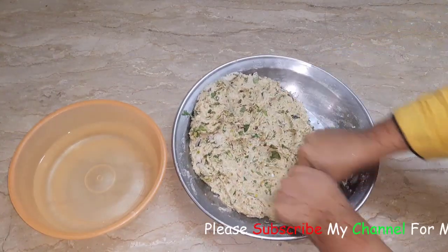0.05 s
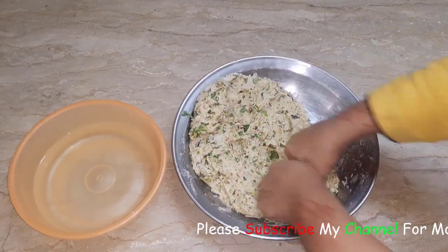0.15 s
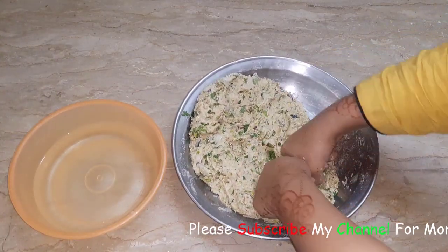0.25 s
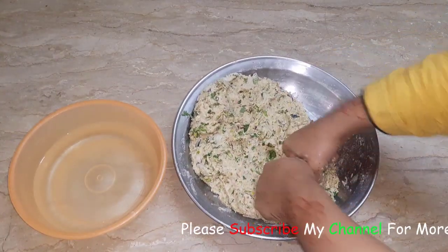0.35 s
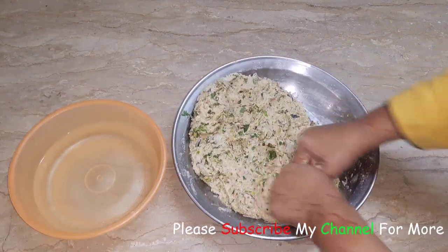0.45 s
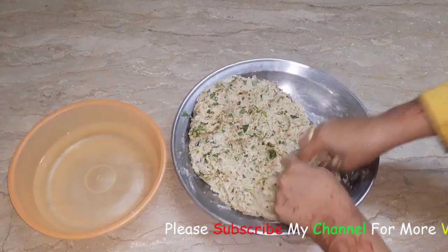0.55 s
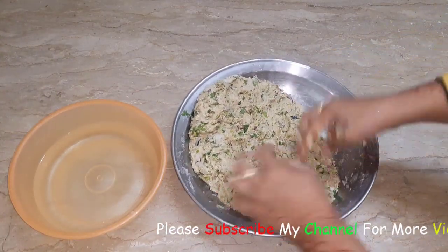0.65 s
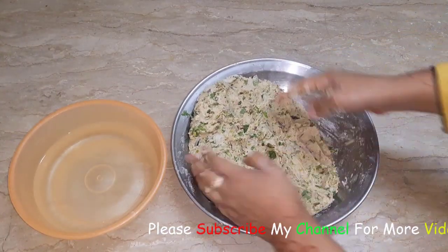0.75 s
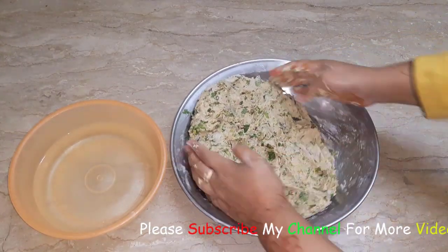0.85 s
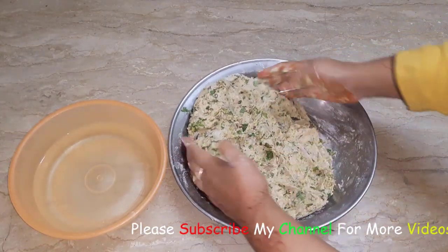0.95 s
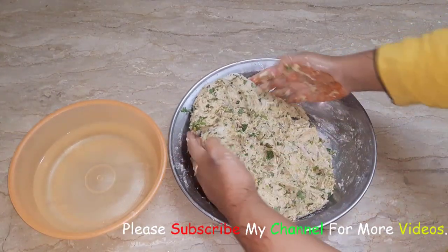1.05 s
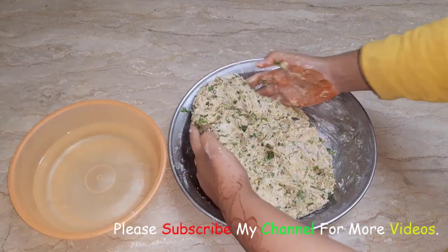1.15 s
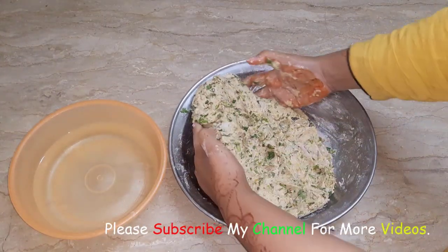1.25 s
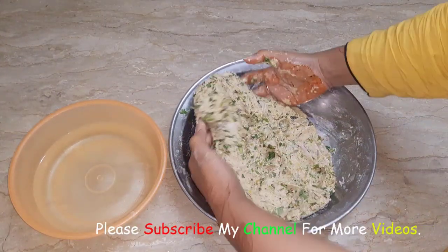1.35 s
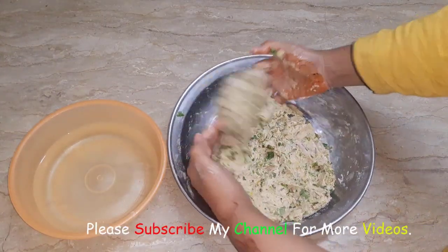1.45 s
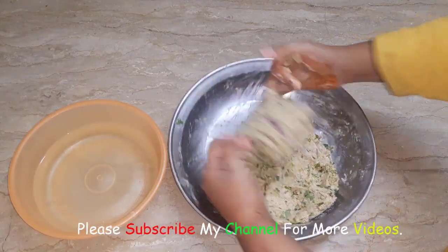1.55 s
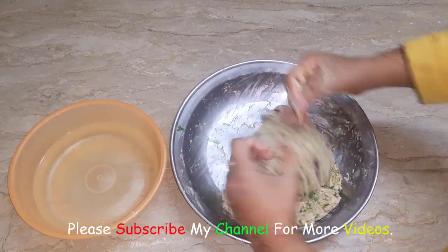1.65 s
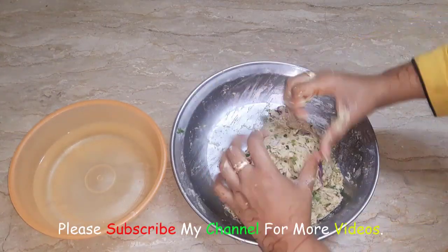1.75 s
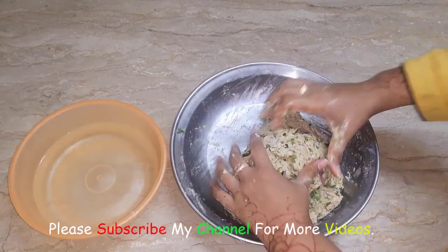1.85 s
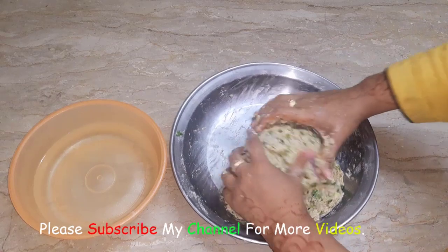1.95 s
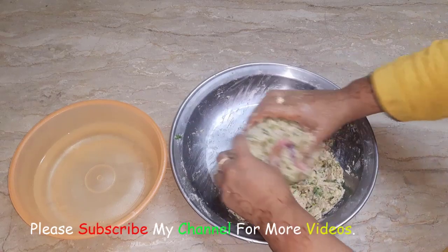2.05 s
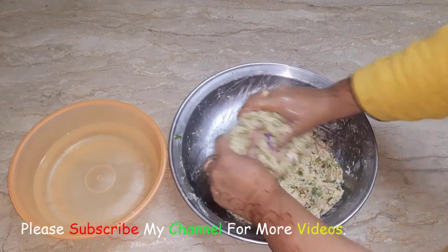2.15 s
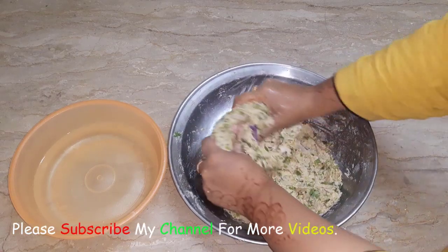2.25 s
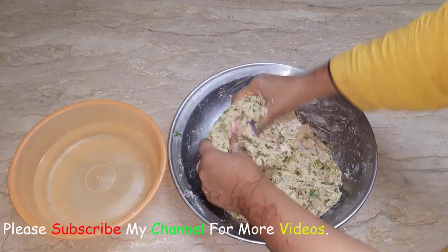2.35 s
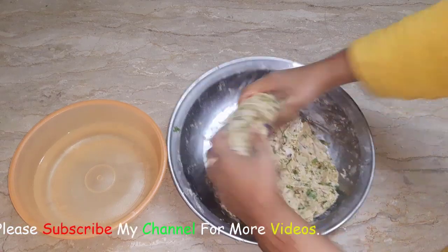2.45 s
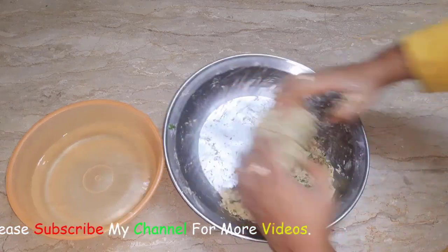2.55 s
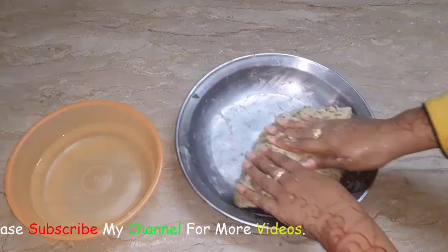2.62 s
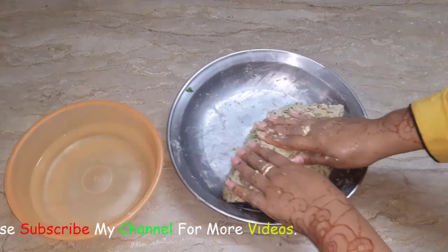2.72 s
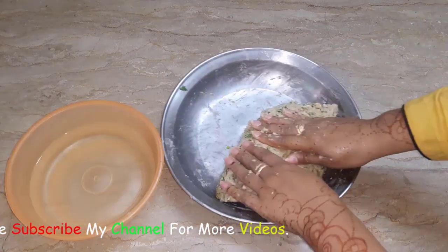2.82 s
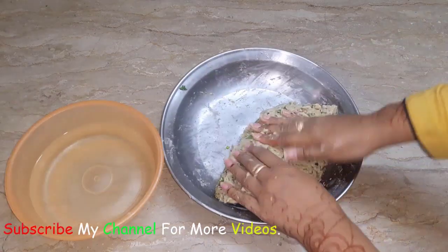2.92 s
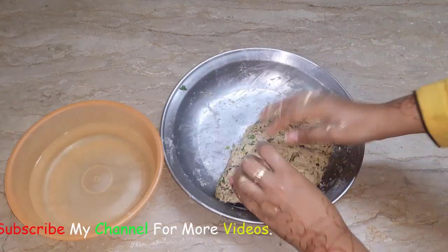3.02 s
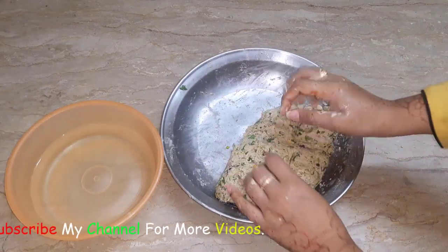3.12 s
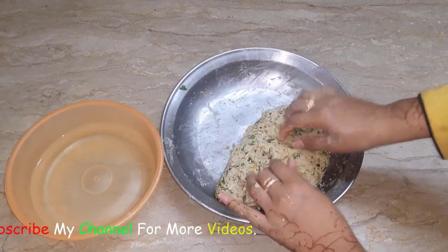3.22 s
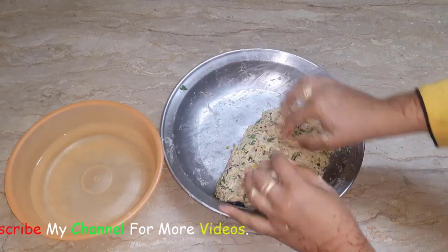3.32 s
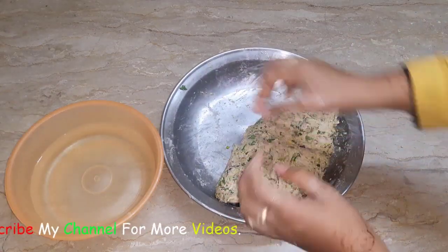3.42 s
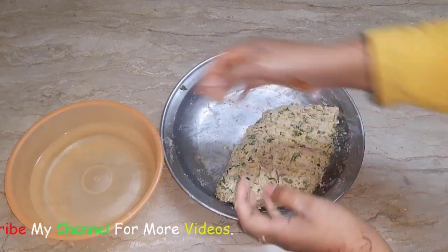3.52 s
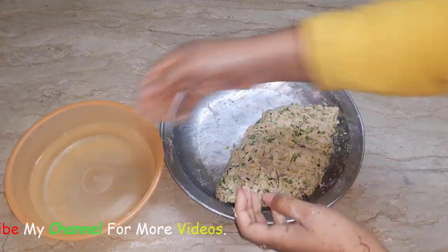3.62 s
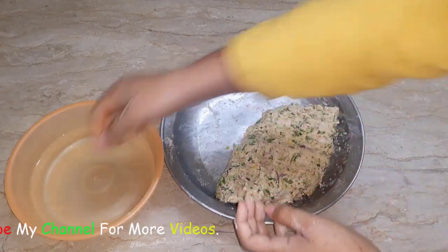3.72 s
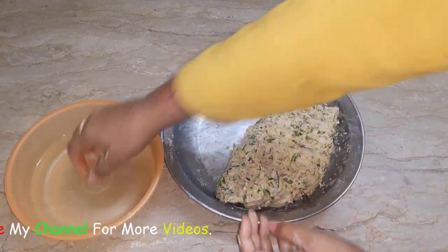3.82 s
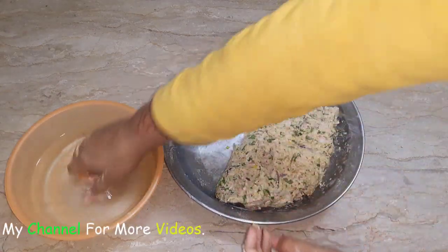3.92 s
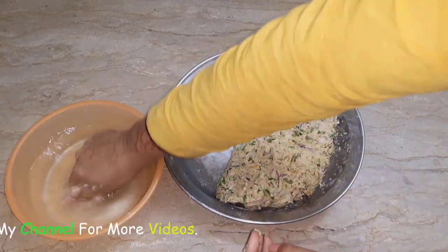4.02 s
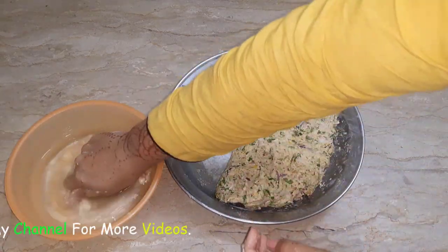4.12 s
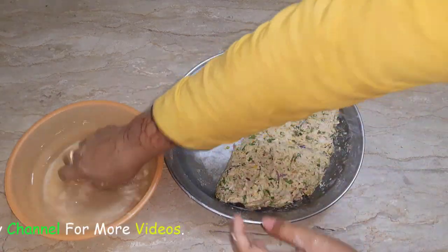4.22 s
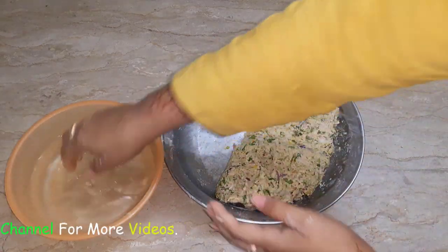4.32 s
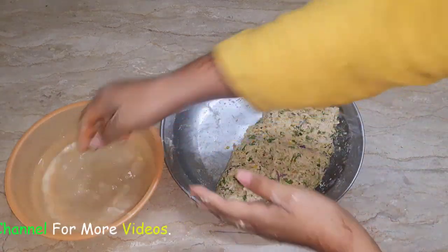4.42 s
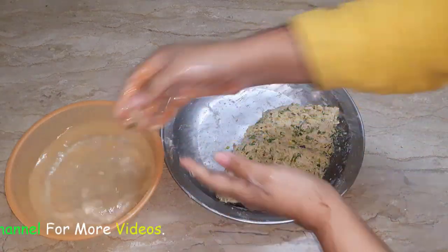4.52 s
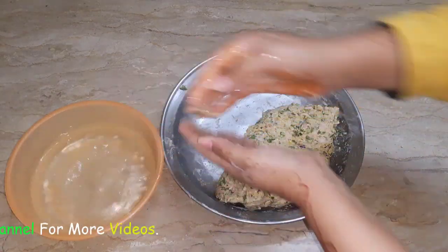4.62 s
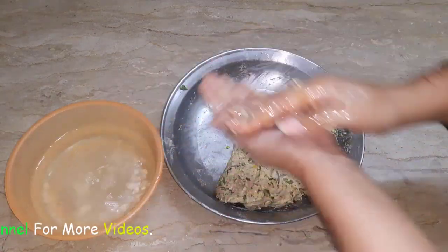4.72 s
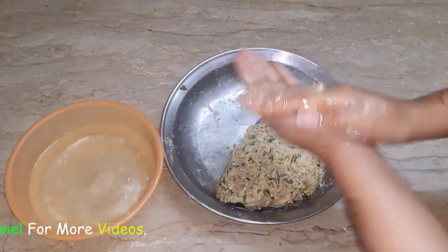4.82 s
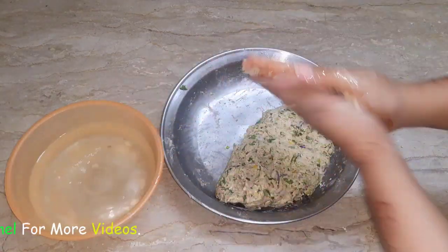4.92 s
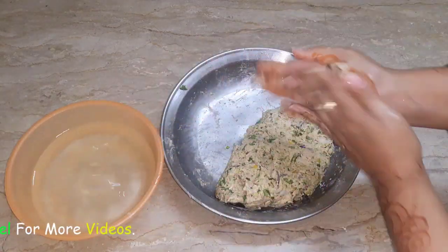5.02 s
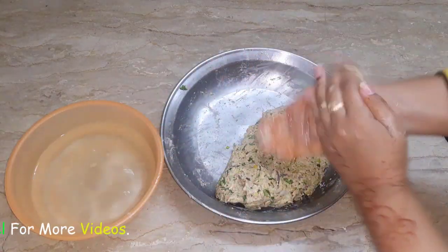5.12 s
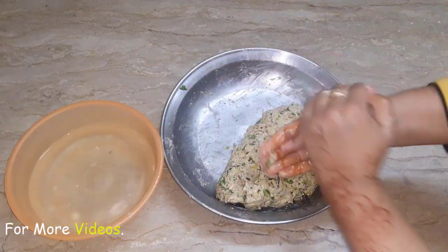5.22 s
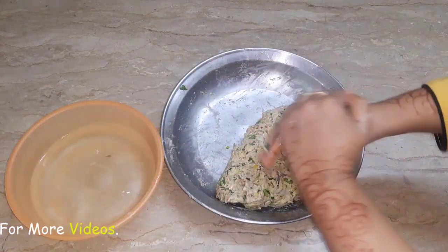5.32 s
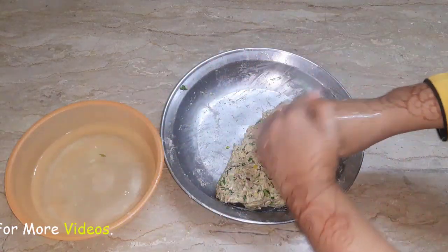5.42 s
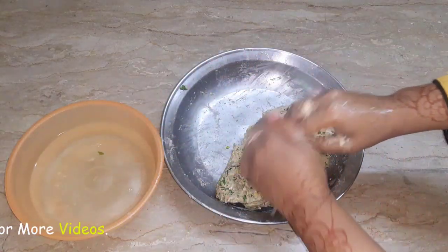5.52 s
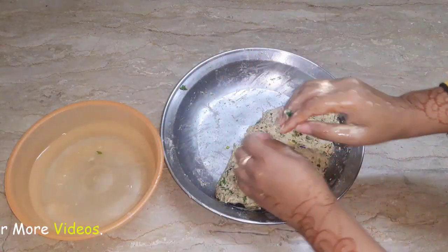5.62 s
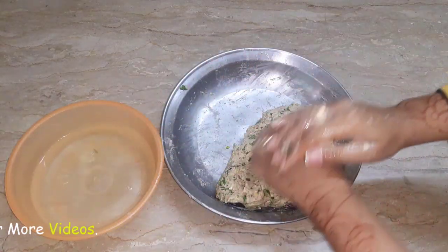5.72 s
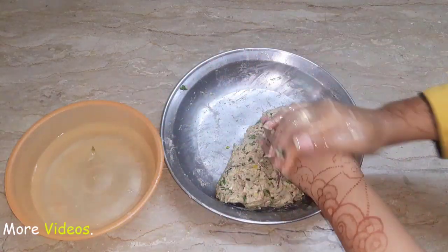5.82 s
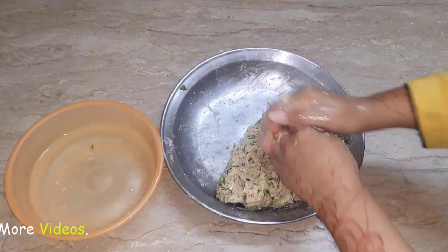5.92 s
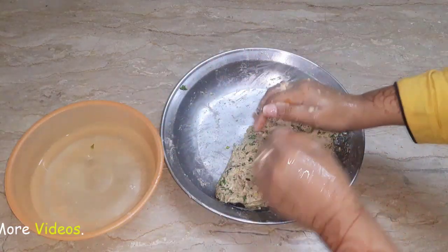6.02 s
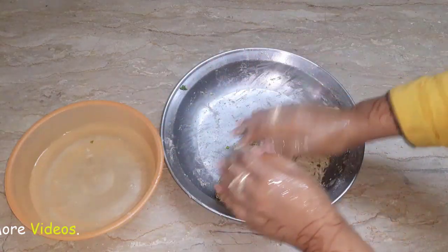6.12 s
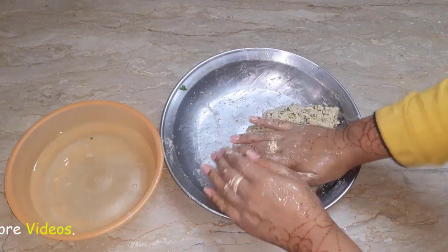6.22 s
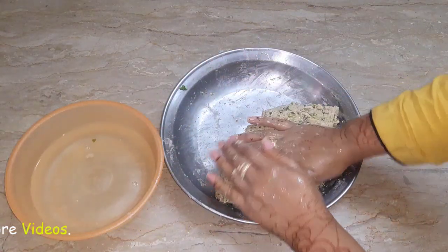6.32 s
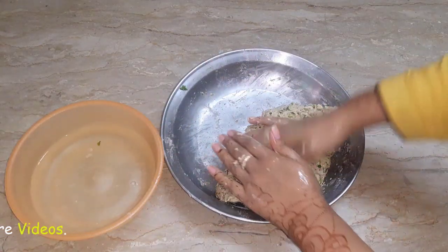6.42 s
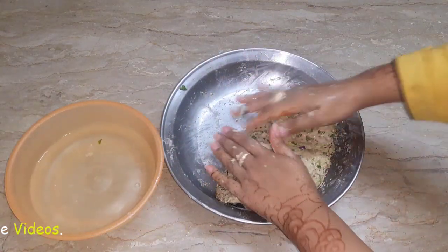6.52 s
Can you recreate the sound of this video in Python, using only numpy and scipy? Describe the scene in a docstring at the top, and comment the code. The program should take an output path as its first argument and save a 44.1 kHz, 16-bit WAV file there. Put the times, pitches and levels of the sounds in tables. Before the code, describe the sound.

A loud clattering thump opens, followed by more plate knocks, grainy dough rustle and tiny clicks, peaking in a rapid burst of heavy blows. The ringing is chopped off by an edit. Then faint skin rubbing, a brief dip in water with bubbly plips, a squishy squeeze of wet hands and a soft press on dough. Close stereo pickup in a hard-surfaced home room, with faint low hum.

```python
"""Hard knocks and a rustle of wet dough, small sharp ticks, a hand in water, over a low wavering hum. Hands
fold wet dough in a steel plate on a stone floor: blows are noise cracks, sine thumps and low resonances; rubs
and presses are shaped grains of noise; ticks and drips are short sines that rise in pitch. Knocks, booms, ticks
and drips ring in a hard room made of sparse random taps. An edit joins two shots and chops the ringing of the
first."""
import sys
import numpy as np
from scipy import signal
from scipy.fft import rfft, irfft, next_fast_len
from scipy.io import wavfile

SR = 44100
rng = np.random.default_rng(int(sys.argv[2]) if len(sys.argv) > 2 else 0)


def ratio(d):
    """dB to gain"""
    e = np.asarray(d, float) / 20
    return 10 ** e


def int16_out(signal):
    """Quantize to a 16-bit WAV file."""
    q = np.round(np.clip(np.atleast_2d(signal).T, -1, 1) * 32767)
    wavfile.write(sys.argv[1], SR, q.astype(np.int16))


N = 289296  # length in samples
EDIT_S = 2.644  # the second shot begins

# low resonances that blows and grinding set ringing: f/Hz, level/dB, t60/s
LOW_MODES = [(156, 2, 0.13), (300.8, 1, 0.18), (337.3, -19, 0.041), (431, -9, 0.17), (507.6, -6.5, 0.22),
             (614, -21, 1), (727.3, -7.5, 0.17), (793, -23, 0.69), (807, -16.5, 0.2)]


def evened(x):
    """Scales to rms 1."""
    return x / np.sqrt(np.mean(x ** 2) + 1e-20)


def read(points, hz):
    """Reads a curve on a log-frequency axis."""
    f, value = np.transpose(points)
    return np.interp(np.log(hz + 1), np.log(f + 1), value)


def add(mix, s, sound):
    """Mixes a sound in at time s."""
    part = mix[..., round(s * SR):][..., :sound.shape[-1]]
    part += sound[..., :part.shape[-1]]


def colour(x, gain):
    """Filters by a gain that is a function of frequency."""
    size = next_fast_len(x.shape[-1])
    spectrum = rfft(x, size) * gain(np.fft.rfftfreq(size, 1 / SR))
    return irfft(spectrum, size)[..., :x.shape[-1]]


def resonate(x, hz, width_hz):
    """One resonance of gain 1: shifts the band at hz down to zero, smooths it, and shifts it back."""
    carrier = np.exp(2j * np.pi * np.cumsum(hz * np.ones(N)) / SR)
    pole = np.exp(-np.pi * width_hz / SR)
    smoothed = signal.lfilter([1 - pole], [1, -pole], x / carrier)
    return 2 * (carrier * smoothed).real


def resonate_twice(x, hz, width_hz):
    """Two equal resonances in a row, for steeper flanks; width_hz is that of each."""
    return resonate(resonate(x, hz, width_hz), hz, width_hz)


def pair(left, other):
    """Two channels whose likeness depends on frequency, by mixing shared and independent sound."""
    # likeness of left and right: f/Hz, share
    likeness = [(60, 0.77), (180, 0.96), (400, 0.68), (800, 0.54), (1650, 0.024), (5000, .05)]

    def same(hz):
        return np.clip(read(likeness, hz), 0, 1)
    right = colour(left, same) + colour(other, lambda hz: np.sqrt(1 - same(hz) ** 2))
    return np.array([left, right])


def grains(per_s, spread_db, smooth):
    """Smooth noise with sparse clicks of uneven size on top, two channels."""
    noise = rng.standard_normal((2, N))
    size = ratio(spread_db * np.minimum(rng.exponential(1, N), 4))
    clicks = evened(size * (rng.random(N) < per_s / SR))
    return evened(pair(*(noise * (smooth + clicks))))


def wet_grains():
    """Dense wet clicks over mostly smooth noise."""
    return grains(per_s=400, spread_db=3.5, smooth=2.5)


def same_shot(s, t):
    """A sound begun at s does not ring across the edit."""
    return (s > EDIT_S) == (t > EDIT_S)


def background():
    """The quiet air of the room is coloured noise; the hum is a sine with narrow noise around it."""
    # colour of the air before its overall level is set: f/Hz, level/dB
    air_colour = [(25, -41), (60, -8), (130, -3), (200, -11.5), (300, -9), (550, -13), (850, -19),
                  (1150, -32), (2300, -37.5), (2800, -40.5), (3600, -38.5), (6500, -37), (12800, -34),
                  (14300, -35.5), (15800, -65)]
    # level of the hum over time: t/s, rms level/dB
    hum_levels = [(0.0, -53), (1.2, -58), (2.2, -60.5), (3.001, -62.5), (3.6, -56), (4.1, -59.5),
                  (4.5, -53.5), (5.051, -64.5), (5.7, -54.5), (6.05, -66), (6.56, -64)]
    air_db, hum_hz, hum_width_hz = -59, 100, 4
    t = np.arange(N) / SR
    air = colour(pair(*rng.standard_normal((2, N))), lambda hz: ratio(read(air_colour, hz)))
    waver = evened(resonate(rng.standard_normal(N), hum_hz, hum_width_hz))
    hum = np.sin(2 * np.pi * hum_hz * t) + 0.12 * waver
    hum_gain = ratio(np.interp(t, *np.transpose(hum_levels)))
    return ratio(air_db) * evened(air) + hum_gain * evened(hum)


def strokes(rows):
    """Every stroke swells to its peak and dies away; gains of its two layers, strokes adding in power."""
    slope_db = 20  # the rise and fade times each cover this much
    t, power = np.arange(0, N + 64, 32) / SR, 0
    for s, rise_s, fade_s, db, above_db in rows:
        steps = np.maximum((s - t) / max(rise_s, .002), (t - s) / max(fade_s, .002))
        layers_db = np.array([[db], [db + above_db]])
        gain = ratio(layers_db - slope_db * np.minimum(steps, 10)) * same_shot(s, t)
        power = power + gain ** 2
    return [np.interp(np.arange(N) / SR, t, np.sqrt(p)) for p in power]


def hands():
    """Fine dry grains, wet grains in large and in small pockets, and grit shaking the low resonances."""
    # skin slides over dough or skin: peak t/s, rise/s, fade/s, dry rustle level/dB, wet smack above it/dB
    rubs = [(0.0, 0.018, .12, -40, 3), (0.208, 0.081, 0.12, -50.5, 13.5), (0.28, 0.027, 0.14, -48, 6),
            (0.45, 0.037, 0.14, -42, -5), (0.56, 0.084, 0.092, -45, -0.5), (0.64, 0.11, 0.069, -92, 0),
            (1.06, 0.4, 0.83, -56, 0), (1.46, 0.08, 0.26, -41.5, -4), (1.75, 0.57, 0.084, -53.5, -1),
            (2.09, .1, .8, -50.5, -0.5), (2.45, 0.28, 0.46, -47, -3.5), (2.466, 0.0071, 0.041, -36, 3.5),
            (2.508, .015, 0.035, -33.5, -3), (2.544, 0.018, .3, -38.5, 4), (2.68, .15, .45, -58.5, 3.5),
            (3.03, 0.12, 0.14, -51.5, -7), (3.352, 0.017, 0.148, -72.5, -19), (3.536, .2, 0.138, -64.5, -1),
            (3.904, 0.053, .05, -63, -18), (4.038, 0.017, 0.013, -45, -4.5), (4.074, 0.039, 0.11, -44.5, 1),
            (4.27, 0.0098, 0.045, -77, 25), (4.58, 0.054, 0.99, -67, -10), (4.804, .06, 0.174, -65, -12.5),
            (5.02, .012, 0.0395, -55, -14.5), (5.08, 0.61, 0.62, -67.5, -6),
            (5.212, 0.018, .7, -62.5, -8.5), (5.47, .015, 0.078, -43, -2.5),
            (5.52, 0.055, 0.17, -57.5, 4.5), (5.95, 0.046, 0.104, -65.5, -5), (6.24, 0.01, 0.12, -60, 9),
            (6.283, 0.031, 0.1, -71, 27.5), (6.427, 0.11, 0.14, -53, -2)]
    # weight goes into dough or water: peak t/s, rise/s, fade/s, plate grinding level/dB,
    # dull squelch above it/dB
    presses = [(0.0, .012, 0.17, -12.5, -15.5), (0.208, 0.17, 0.15, -42, 2), (0.3, .1, 0.14, -45.5, -9),
               (0.55, 0.19, 0.16, -41.5, -5), (0.636, 0.041, 0.17, -28.5, -11),
               (0.82, 0.33, 0.35, -37, -30), (1.15, 0.23, 0.36, -52, 2), (1.46, 0.15, 0.2, -57.5, 8.5),
               (1.648, 0.33, 0.15, -29.5, -18), (2.09, 0.052, 0.44, -50.5, 8.5),
               (2.208, 0.25, 0.12, -67, 13), (2.466, 0.016, 0.025, -48, 20), (2.508, .012, 0.012, -51, 25),
               (2.6, .1, 0.35, -70, 9), (2.65, 0.021, 0.022, -49, 8), (3.02, 0.9, 1, -55.5, -15),
               (3.536, 0.14, 0.46, -48.5, -10), (3.94, 0.0073, .3, -49.5, -14),
               (4.06, 0.3, 0.73, -54.5, -6.5), (4.3, .06, 0.164, -42.5, -7.5),
               (4.54, 0.17, 0.71, -59.5, -34), (5.03, 0.11, 0.33, -64.5, -19),
               (5.28, 0.23, 0.13, -60.5, -10), (5.9, 0.44, 1, -60.5, -11), (6.245, .012, 0.18, -47.5, -7),
               (6.44, .15, .6, -53.5, -7.5)]
    # colour of the dry rustle: f/Hz, level/dB
    rustle_colour = [(1470, -28), (2500, -7), (2880, -10), (4170, -28), (4620, -8), (6500, -6),
                     (9960, -7.5), (13100, -0.5), (16000, -11)]
    squelch_top_hz = 2900  # large pockets give little above this

    dry_rub = grains(per_s=500, spread_db=3.5, smooth=1.8)
    dry_rub = colour(dry_rub, lambda hz: ratio(read(rustle_colour, hz)))
    wet = wet_grains()
    smack = resonate_twice(wet, hz=3800, width_hz=3000)
    squelch = resonate_twice(wet, hz=1900, width_hz=2030)
    squelch = colour(squelch, lambda hz: 1 / (1 + (hz / squelch_top_hz) ** 10))
    grit = grains(per_s=600, spread_db=3, smooth=3)
    grind = sum(ratio(db) * resonate_twice(grit, hz, width_hz=55) for hz, db, _ in LOW_MODES)

    gains = strokes(rubs) + strokes(presses)
    return sum(gain * evened(sound) for gain, sound in zip(gains, (dry_rub, smack, grind, squelch)))


def crack(tilt_db):
    """A sharp noise snap with a weaker rattle behind it, dulled or brightened above a knee; peak 1."""
    snap_s, rattle_s, rattle_db = 0.00027, 0.0046, -11  # decay times to 1/e
    knee_hz, bass_cut_hz = 1007, 250
    shared, *own = rng.standard_normal((3, 1024))
    t = np.arange(1024) / SR - .001  # starts 1 ms late
    decay = np.exp(-t / snap_s) + ratio(rattle_db) * np.exp(-t / rattle_s)
    burst = (shared + 0.75 * np.array(own)) * decay * (t > 0)

    def tone(hz):
        octaves = np.log2(np.maximum(hz, knee_hz) / knee_hz)
        return ratio(tilt_db * octaves) * hz ** 2 / (hz ** 2 + bass_cut_hz ** 2)
    sound = colour(burst, tone)
    return sound / abs(sound).max()


def knocks():
    """Each knock: a short crack, a low thump and the low resonances; dealt in turn to three room paths."""
    # plate or bowl knocks on the floor: t/s, crack level/dB, thump level/dB, thump f/Hz,
    # crack brightness/dB per octave
    blows = [(0.002, -19.5, -6.5, 203, -5.5), (0.01, -9.5, -13.5, 280, -7.5),
             (0.024, -3.5, -20.5, 181, -13), (0.191, -27, -24, 156, -10), (0.255, -36.5, -26, 156, -13.5),
             (0.556, -24.5, -58, 167, -5), (0.609, -35.5, -30, 510, -18), (0.628, -12.5, -23, 533, -12),
             (0.646, -16, -16.5, 295, -12), (0.712, -21, -40, 315, -18), (0.861, -18, -23.5, 277, -14.5),
             (0.924, -23, -32, 504, -14), (1.005, -40, -63, 324, -21.5), (1.027, -34.5, -61, 302, -1),
             (1.073, -28.5, -71.5, 278, -4), (1.374, -41, -53.5, 281, -9), (1.449, -13, -20, 200, -14),
             (1.504, -26, -23, 243, -10), (1.596, -20, -33.5, 216, -11), (1.636, -15, -17, 184, -13),
             (1.664, -33, -18, 237, -17.5), (1.717, -32.5, -25.5, 221, -24.5), (1.76, -47.5, -31, 216, -11),
             (1.81, -47.5, -37, 194, -18), (2.034, -33.5, -37, 104, -11.5), (2.181, -20.5, -37, 204, -5),
             (2.345, -36, -60, 152, -21.5), (2.465, -13, -14.5, 180, -15), (2.507, -4, -8.5, 184, -11),
             (2.545, -9, -12.5, 351, -6.5), (2.593, -5, -19, 508, -13.5), (2.608, -17.5, -8, 148, -8.5),
             (3.944, -50, -60, 155, 11), (3.984, -47, -33.5, 167, -20), (4.003, -34, -35.5, 290, -6.5),
             (4.034, -52, -29, 155, -16), (4.075, -42, -36.5, 296, -19), (4.25, -62, -38, 296, -18),
             (4.28, -36, -41, 312, -26), (4.319, -27.5, -44, 297, -8), (6.236, -30.5, -45, 542, -6.5),
             (6.249, -37, -28, 573, -9), (6.254, -47, -21.5, 260, -10), (6.288, -32, -28.5, 303, -15),
             (6.314, -32.5, -30.5, 224, -11.5)]
    ring_db = -18.5  # ring of the low resonances against the thump
    out, t = np.zeros((3, 2, N)), np.arange(SR // 2) / SR
    hz, db, t60 = np.transpose(LOW_MODES)[:, :, None]
    onset = 1 - np.exp(-t / 0.002)
    for k, (s, crack_db, thump_db, thump_hz, tilt_db) in enumerate(blows):
        thump = np.sin(2 * np.pi * thump_hz * t) * np.exp(-t / 0.0094) * onset
        struck = rng.standard_normal((len(LOW_MODES), 1))  # each blow sets the resonances ringing in a different mix
        modes = struck * ratio(db - 60 * t / t60) * np.sin(2 * np.pi * hz * t)
        ring = modes.sum(0) * onset
        low = ratio(thump_db) * (thump + ratio(ring_db) * ring)
        add(out[k % 3], s, ratio(crack_db) * crack(tilt_db))
        add(out[k % 3], s, low * same_shot(s, s + t))
    return out


def booms():
    """A slow, deep swing of the floor under the heaviest landings: a damped sine with a soft onset."""
    # the whole lump lands and the floor booms: t/s, level/dB, f/Hz
    landings = [(0.02, -50, 99), (0.625, -20, 61), (0.7, -26, 67), (0.868, -27, 66), (0.951, -37, 100),
                (1.45, -36, 99), (1.6, -24, 85), (2.039, -44, 100), (2.468, -34, 101), (2.58, -31, 94.4)]
    out, t = np.zeros(N), np.arange(SR // 2) / SR
    for s, db, hz in landings:
        boom = np.sin(2 * np.pi * hz * t) * np.exp(-t / 0.025) * (1 - np.exp(-t / .02))
        add(out, s, ratio(db) * boom * same_shot(s, s + t))
    return out


def closing_pockets(rows, cycles):
    """A few cycles that rise in pitch as the pocket of air or water closes, with a snap at the front."""
    out = np.zeros((2, N))
    for s, db, hz, pan_db in rows:
        delay = rng.uniform(0, 0.00049, (2, 1))  # unequal paths to the microphones
        t = np.maximum(np.arange(400) / SR - delay, 0)
        turns = hz * t * (1 + 0.0031 * hz * t)
        body = np.sin(2 * np.pi * turns) * np.exp(-hz * t / cycles) * (1 - np.exp(-hz * t / 0.37))
        snap = rng.standard_normal((2, 400)) * np.exp(-t / 0.003)
        # noise spread around the starting pitch
        snap = .5 * colour(snap, lambda f: np.exp(-(np.log((f + 1) / hz) / 0.36) ** 2))
        sides_db = db + np.array([[.5], [-.5]]) * pan_db
        add(out, s, ratio(sides_db) * (body + snap))
    return out


def ticks():
    """Sticky dough or wet skin lets go: pockets that die within a few cycles."""
    # t/s, level/dB, starting f/Hz, left minus right/dB
    releases = [(0.177, -26.5, 2700, -6.5), (0.2114, -26, 3600, 7), (0.2815, -33.5, 6640, -6.5),
                (0.2992, -28, 6200, 3.5), (0.4417, -28, 5810, 6), (0.5478, -33, 8510, -3.5),
                (1.0266, -35.5, 14150, -8), (1.3035, -38, 12300, 12.5), (1.3762, -26.5, 6450, -0.5),
                (1.3996, -30, 11700, -3), (1.6963, -29.5, 12840, -2.5), (2.4389, -30, 12700, -10.5),
                (2.4585, -26, 2630, -11), (2.5134, -27, 2463, -11), (2.6184, -29, 2750, -9.5),
                (2.9013, -38.5, 12100, 7), (2.9567, -38, 13000, 1), (2.9795, -42.5, 11380, -9),
                (3.0311, -24.5, 11740, -2.5), (3.0415, -30.5, 5780, -2.5), (3.3514, -42.5, 6250, -1),
                (3.9594, -47.5, 6800, -2), (4.0028, -40, 2570, -8), (4.0592, -37, 5400, -10),
                (4.076, -24.5, 6420, -4), (4.573, -41.5, 12300, -3.5), (4.8068, -48.5, 12600, -12.5),
                (5.0184, -36, 8130, -4.5), (5.214, -41.5, 13280, -1.5), (5.3256, -37, 7200, -7.5),
                (5.328, -37.5, 3080, 0), (5.4604, -40, 3400, 22), (5.4683, -24.5, 4140, -4),
                (5.473, -22, 6620, 0), (5.9331, -44.5, 4900, 1), (6.2679, -35, 5450, -13),
                (6.2832, -41, 3910, -8.5), (6.3008, -31.5, 3970, 14), (6.3983, -32.5, 4240, -2),
                (6.4532, -42.5, 6240, -1)]
    return closing_pockets(releases, cycles=3.2)


def ping():
    """A thin high ring of the plate as the second shot opens: narrow noise, one wavering partial."""
    s, hz, db, t60 = 2.648, 8650, -60, .9
    since = np.arange(N) / SR - s
    partial = evened(resonate(rng.standard_normal((2, N)), hz, width_hz=40.))
    return ratio(db - 60 * np.maximum(since, 0) / t60) * (since > 0) * partial


def squishes():
    """Water squeezed through one pocket between the fingers: wet grains in a narrow resonance."""
    # t/s, time to fade by 20 dB/s, level/dB, pocket f/Hz
    squeezes = [(3.55, 0.25, -68, 2200), (3.72, 0.08, -65, 2170), (4.282, .2, -48.5, 1096),
                (4.285, .1, -46, 3140), (5.246, 0.15, -63.5, 1690), (5.247, 0.14, -58, 3100),
                (5.33, 0.22, -59, 3800), (5.475, 0.17, -46.5, 4090), (5.8, 0.8, -68, 2210),
                (6.07, 0.28, -69, 2180), (6.29, 0.099, -52, 4060)]
    width_share, rise_share = .2, .08  # of the pocket's pitch, of the fade
    wet, t = wet_grains(), np.arange(N) / SR
    out = np.zeros((2, N))
    for s, fade_s, db, hz in squeezes:
        since = np.maximum(t - s, 0)
        gain = ratio(db - 20 * since / fade_s) * (1 - np.exp(-since / (rise_share * fade_s)))
        out += gain * evened(resonate_twice(wet, hz, width_share * hz))
    return out


def drips():
    """Bubbles and drips at the bowl: closing pockets that ring for more cycles than the ticks."""
    # t/s, level/dB, starting f/Hz, left minus right/dB
    drops = [(4.0347, -25.5, 4120, 3), (4.2309, -46, 7200, 6), (4.2694, -37.5, 3840, -2),
             (4.2805, -36, 4060, 7), (4.2811, -30, 2680, -6.5), (4.346, -48, 2920, -3),
             (4.568, -48.5, 6750, 6)]
    return closing_pockets(drops, cycles=8.3)


def room(x):
    """Echoes from sparse taps of random sign, each band dying at its own speed."""
    # reverberation time: f/Hz, t60/s
    decay_times = [(60, 0.5), (160, 0.73), (420, 0.67), (1100, 0.5), (2910, 0.77), (7680, 0.52)]
    taps = np.zeros((2, SR))
    at = np.arange(200, SR - 20, 20) + rng.integers(0, 20, (2, (SR - 201) // 20))
    np.put_along_axis(taps, at, rng.choice([-1., 1.], at.shape), 1)
    hz, t, bands = signal.stft(taps, SR, nperseg=512)
    decay = ratio(-60 * t / read(decay_times, hz)[:, None])
    tail = pair(*signal.istft(bands * decay, SR, nperseg=512)[1])
    tail /= np.linalg.norm(tail[0])
    return signal.fftconvolve(np.atleast_2d(x), tail, axes=1)[:, :N]


def shot(sound, paths, start_s, end_s):
    """One shot: what sounds in it, with its echoes, faded in under a millisecond at both ends."""
    room_db, fade_s = 2.5, 0.00067
    t = np.arange(N) / SR
    inside = (t >= start_s) & (t < end_s)
    echoes = sum(room(path * inside) for path in paths)
    fade = np.clip(np.minimum(end_s - t, t - start_s) / fade_s, 0, 1)
    return (sound * inside + ratio(room_db) * echoes) * fade


def scene():
    """All near sounds, the struck and ticking ones with echoes, shot by shot over the background."""
    plate, floor, small, water = knocks(), booms(), ticks(), drips()
    near = plate.sum(0) + floor + small + water + hands() + squishes() + ping()
    small_path = floor + (ratio(-4) * small + ratio(-11) * water).mean(0)
    paths = [*plate.mean(1), small_path]
    first = shot(near, paths, -N / SR, EDIT_S)
    second = shot(near, paths, EDIT_S, 2 * N / SR)
    return first + second + background()


def band_limit(x):
    """A steep low-pass at the top of the band."""
    return signal.sosfilt(signal.butter(12, 16460, fs=SR, output="sos"), x)


def record(dry):
    """Microphones with a bass cut, a cavity peak and a top limit; left and right differ by frequency."""
    # balance of the microphones: f/Hz, left minus right/dB
    balance = [(100, -1), (250, -1), (500, -4.8), (1000, -1.7), (4000, -.7), (8000, -5.7), (13000, -7.5)]
    bass_cut_hz, top_hz = 40, 15900
    peak_hz, peak_width_hz, peak_db = 6800, 990, 3.52  # cavity resonance
    side = np.array([[.5], [-.5]])

    def microphones(hz):
        """Gain of the left and the right microphone."""
        cavity_db = peak_db * np.exp(-((hz - peak_hz) / peak_width_hz) ** 2)
        bass_cut = hz ** 3 / (hz ** 3 + bass_cut_hz ** 3)
        return ratio(cavity_db + side * read(balance, hz)) * bass_cut * (hz < top_hz)
    mix = colour(dry, microphones)
    return band_limit(mix)


dry = scene()
out = record(dry)
int16_out(out)
```